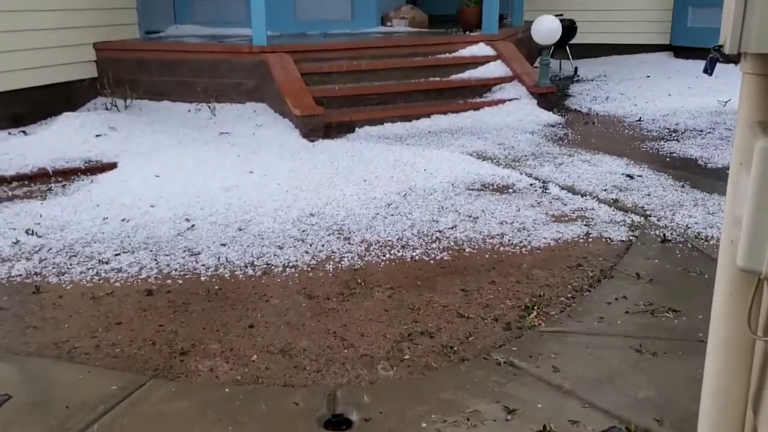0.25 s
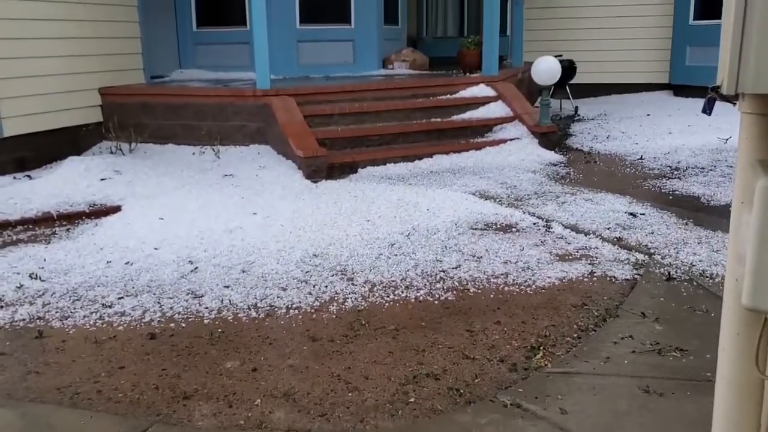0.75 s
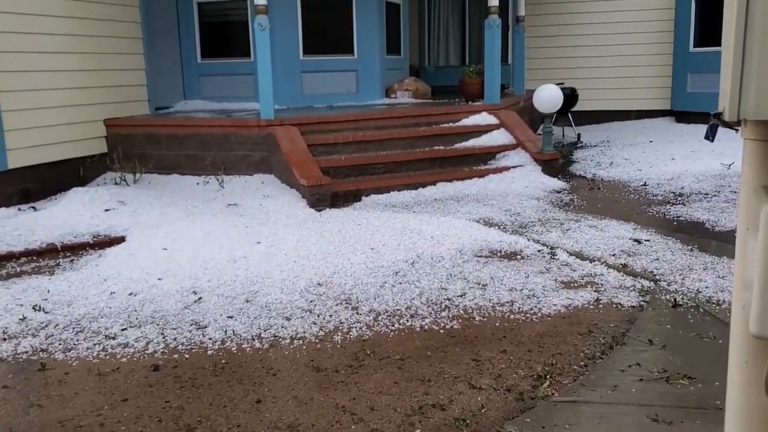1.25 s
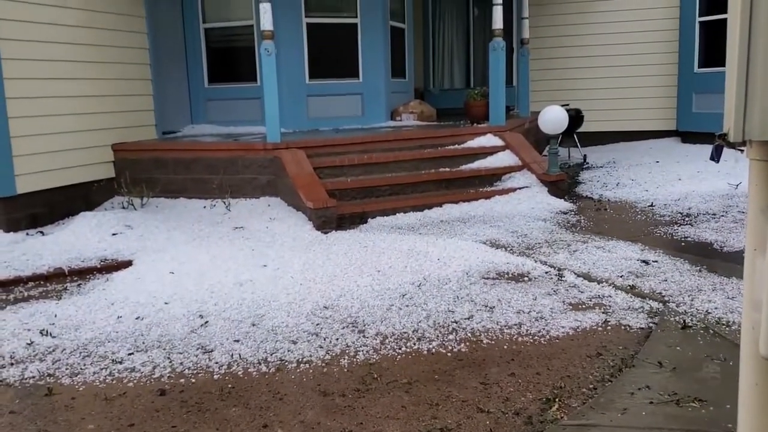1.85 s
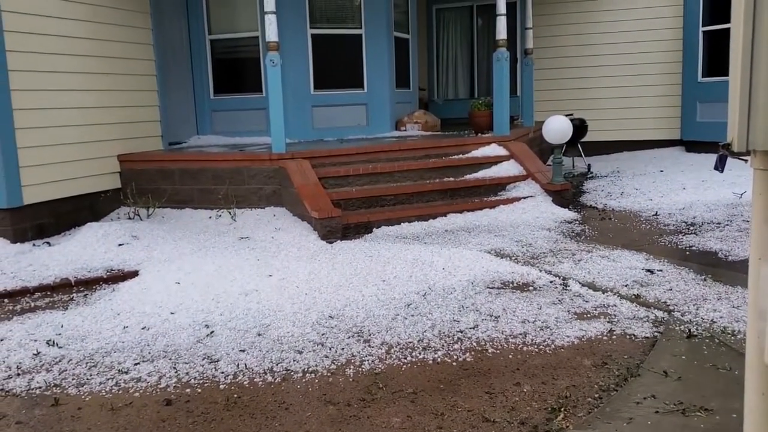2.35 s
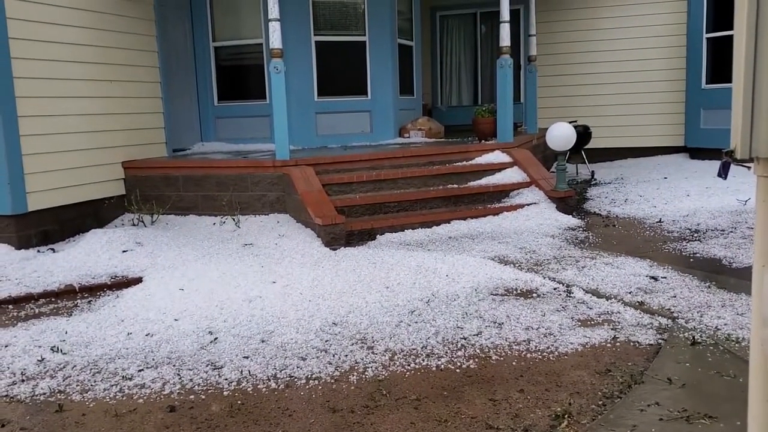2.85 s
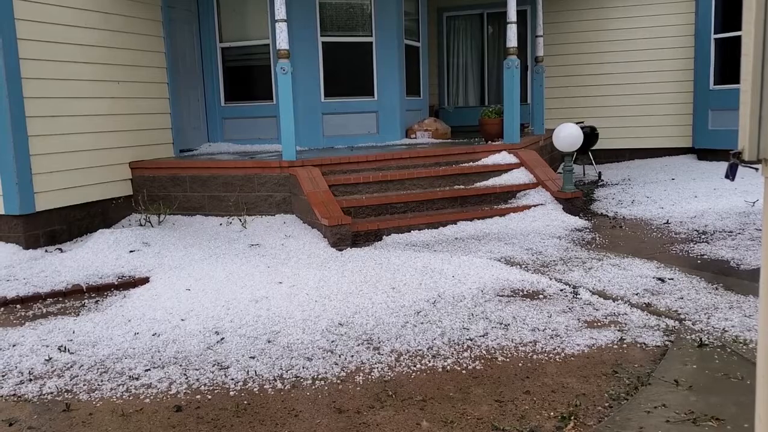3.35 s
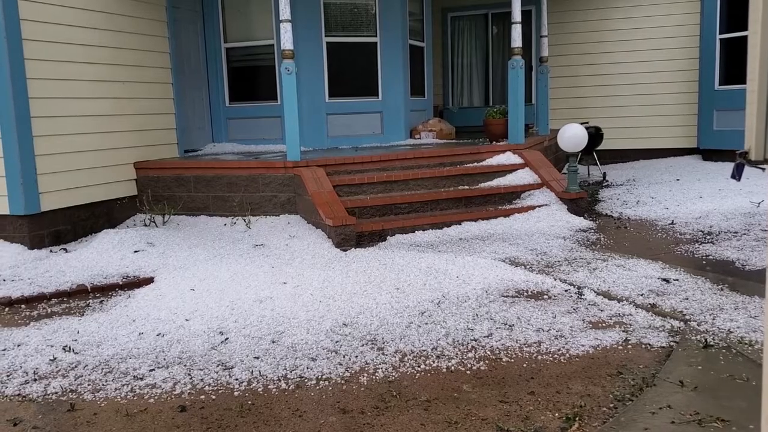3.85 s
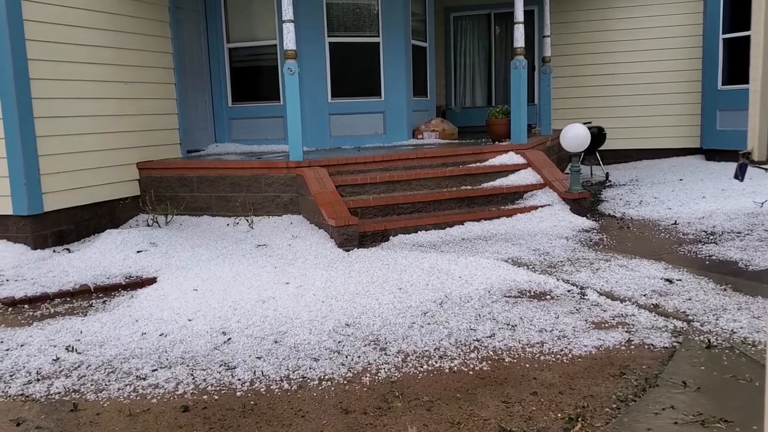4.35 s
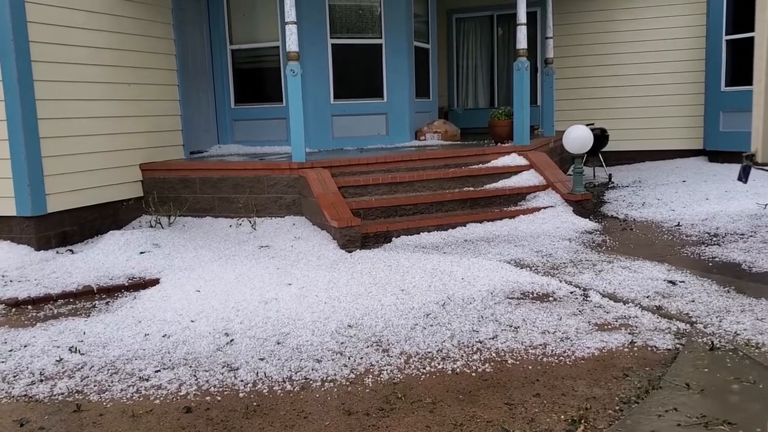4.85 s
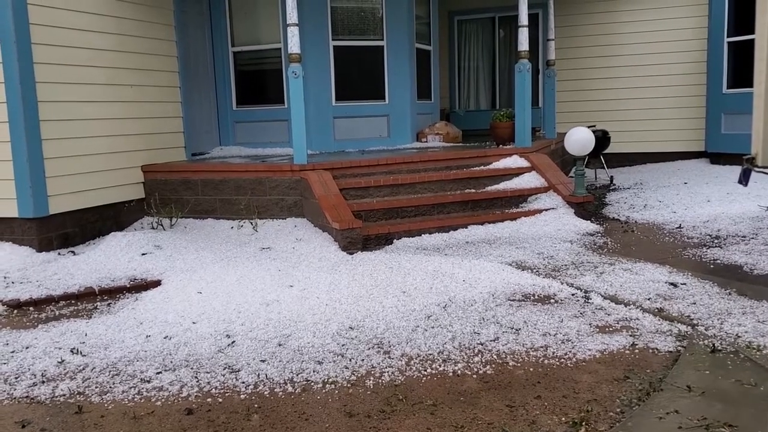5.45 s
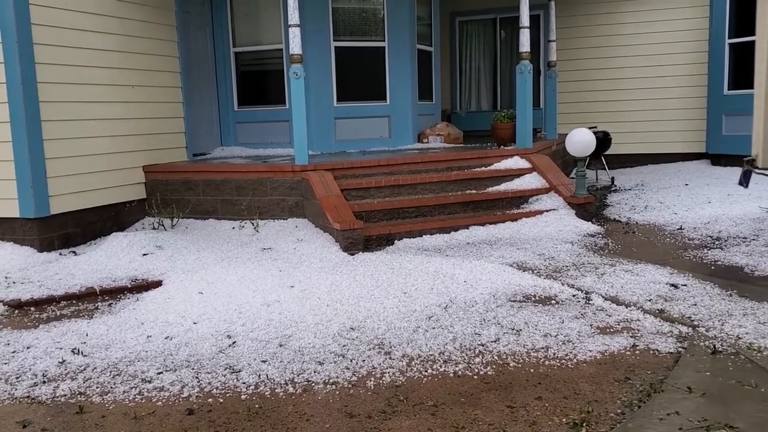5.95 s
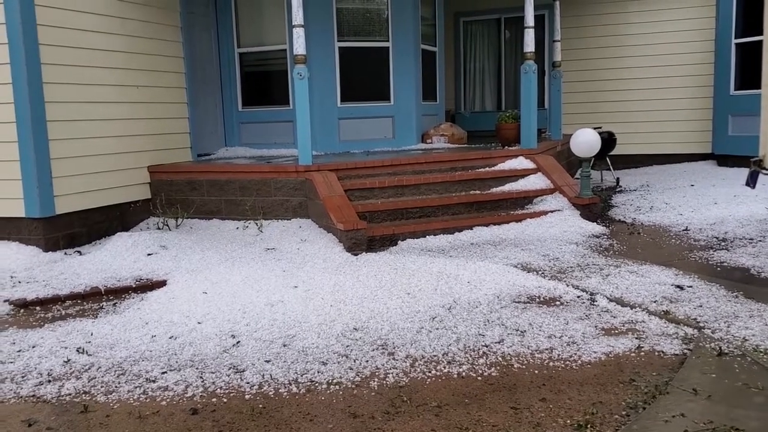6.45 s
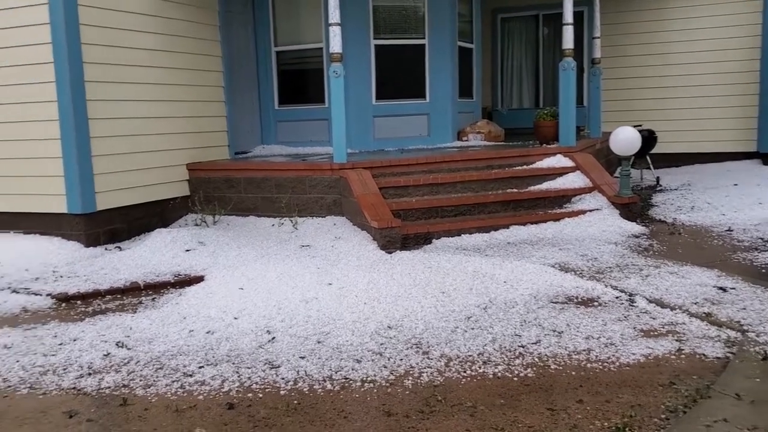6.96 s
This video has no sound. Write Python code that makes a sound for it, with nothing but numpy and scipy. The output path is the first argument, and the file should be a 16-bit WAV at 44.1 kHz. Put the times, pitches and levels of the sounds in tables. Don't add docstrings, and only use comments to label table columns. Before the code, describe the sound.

An outdoor yard in wet weather, no people. Scattered sharp clicks and occasional hard knocks stand out from many fainter drops and a grainy hiss of rain. A few short drips ring in puddles and a downpipe. Wind stays soft, easing briefly midway, while dull far thunder swells in bass throughout and deepens later. The stereo microphone is near the house wall; treble is spread, bass is centred.

```python
import sys
import numpy as np
from scipy import signal
from scipy.fft import rfft, irfft, next_fast_len
from scipy.io import wavfile
from scipy.ndimage import uniform_filter1d, map_coordinates

SR = 44100
rng = np.random.default_rng(int(sys.argv[2]) if len(sys.argv) > 2 else 0)


def volts_from_db(level):
    exponent = np.asarray(level, float) / 20
    return 10 ** exponent


def to_wav(s):
    ch = np.atleast_2d(s).T
    pcm = np.round(np.clip(ch, -1, 1) * 32767)
    wavfile.write(sys.argv[1], SR, pcm.astype(np.int16))


N = 317961
TOP_HZ = 15850


def unit(x):
    return x / np.sqrt(np.mean(x ** 2) + 1e-20)


def along(points, hz):
    f, v = np.transpose(points)
    return np.interp(np.log(hz + 1), np.log(f + 1), v)


def curves(rows):
    s, *cols = np.transpose(rows)
    return [np.interp(np.arange(N) / SR, s, c) for c in cols]


def wobble(rate):
    knots = rng.standard_normal(int(N * rate / SR) + 4)
    return map_coordinates(knots, [np.arange(N) * rate / SR])


def coloured(pair, spectrum):
    # frequency_hz, likeness (-1..1)
    alike = [(60, 0.98), (130, 0.86), (290, 0.91), (640, 0.46), (1410, -0.35), (3100, 0.12), (6820, -0.17),
             (15000, -0.0032)]
    size = next_fast_len(N + 8192)
    hz = np.fft.rfftfreq(size, 1 / SR)
    turn = np.arccos(np.clip(along(alike, hz), -1, 1)) / 2
    gain = volts_from_db(along(spectrum, hz)) * (hz < TOP_HZ)
    mid, side = irfft(rfft(pair, size) * gain * [np.cos(turn), np.sin(turn)], size)[:, :N]
    return unit(np.array([mid + side, mid - side]))


def patchy(patchy_db):
    z = signal.stft(rng.standard_normal((2, N)), nperseg=512)[2]
    field = rng.standard_normal(z.shape[1:])
    for axis in (0, 1):
        field = uniform_filter1d(field, size=8, axis=axis)
    return signal.istft(z * volts_from_db(patchy_db * unit(field)), nperseg=512)[1][:, :N]


def landed(drops, thud_db, scatter_db):
    s, db, ring_hz, splash_db = np.transpose(drops)
    return np.c_[s, db, ring_hz, thud_db + 0 * s, splash_db, scatter_db + 0 * s]


def ticks(rows, ring_db, echo_db, size=4096):
    # frequency_hz, gain_db
    ports = [(900, -20.5), (1700, -8.5), (2300, -3.5), (3100, -3), (4200, -3), (5300, -6), (6600, -1.5),
             (8000, -8.5), (11000, -1), (15700, -5), (16100, -8), (16750, -27), (17000, -82)]
    s, db, ring_hz, thud_db, splash_db, scatter_db = (c[:, None] for c in np.transpose(rows))
    count = len(rows)
    t, hz = np.arange(size) / SR, np.fft.rfftfreq(size, 1 / SR)
    dice = rng.random((count, 4))

    scatter_db = scatter_db - 0.21 * (db + 9.5)
    splash_db = splash_db + 0.13 * (db + 13.0)
    t60_s = 0.065 * volts_from_db(0.5 * (scatter_db + 20.5))
    spray = rng.standard_normal((count, 2, size)) * rng.exponential(1, (count, 1, size))
    onset = 1 - np.exp(-t / 0.00031)
    tail = spray * (volts_from_db(scatter_db - 1.5 - 60 * t / t60_s) * onset)[:, None]
    dull = 1 / (1 + 1j * hz / 9000)

    lag = 0.000362 * (2 * dice[:, :1] - 1) * [1, -1] / 2
    first = (0.0009 + lag)[..., None]
    wall = first + 0.0022 + 0.00025 * (dice[:, 1:3, None] - 0.5)
    shatter = 0.19 * rng.standard_normal((count, 1, size)) * volts_from_db(-60 * t / 0.0044)
    crack = rfft((t == 0) + shatter)
    direct = np.exp(-2j * np.pi * hz * first)
    echo = volts_from_db(echo_db) * np.exp(-2j * np.pi * hz * wall)
    z = rfft(tail) * dull + crack * (direct - echo)

    octave = np.log2((hz + 1) / 5200)
    tilt_db = (thud_db + 14.0) * np.clip(-1.4 * octave, 0, 1.3)
    tilt_db += (splash_db + 16.0) * np.clip(1.97 * octave, 0, 1.7)
    bands = (1.044 + 1.13 * dice[:, 3:]) * np.log2((hz + 1) / ring_hz)
    tilt_db += 0.57 * np.cos(2 * np.pi * bands)
    ring = volts_from_db(ring_db) / (1 + ((hz - ring_hz) / (0.06 * ring_hz)) ** 2)

    cep = irfft(np.log(volts_from_db(along(ports, hz) + tilt_db) * (1 + ring) + 1e-6))
    cep[:, 1:size // 2] *= 2
    cep[:, size // 2 + 1:] = 0
    tick = irfft(z * np.exp(rfft(cep))[:, None])
    tick *= (volts_from_db(db) / np.abs(tick).max(axis=(1, 2))[:, None])[..., None]
    at = np.round(s * SR).astype(int) + np.arange(size)
    return np.array([np.bincount(at.ravel(), tick[:, c].ravel(), N + size)[:N] for c in range(2)])


def near_drops():
    # start_s, peak_db, ring_hz, splash_db
    concrete = [(.4434, -20, 11600, -10), (1.2421, -24, 4010, -19), (1.2678, -19, 4440, -19),
                (1.6109, -26.5, 4300, -23), (2.5335, -23.5, 6000, -20), (2.7147, -10.5, 4700, -16.5),
                (2.7604, -23, 4384, -17), (2.921, -25, 6700, -16), (2.9955, -25.5, 10100, -14),
                (3.4945, -18, 6910, -16.5), (3.5763, -33, 8960, -5), (3.6033, -20.5, 3700, -22.5),
                (3.727, -15, 3460, -21), (3.8512, -20, 6500, -14), (4.6605, -19, 4594, -18.5),
                (5.4161, -20, 4714, -28), (5.6491, -23, 6027, -20), (5.7809, -20.5, 11270, 7),
                (6.0172, -31, 11010, 0), (6.0572, -13, 4020, -23), (6.2524, -13.5, 4200, -16),
                (4.784, -22, 11150, -7), (4.106, -34, 6150, -20), (.62, -32, 11000, -7),
                (.846, -28, 9940, -10), (1.18, -31, 12000, -7)]
    # start_s, peak_db, ring_hz, splash_db
    siding = [
        (1.3227, -21, 3220, -21.5),
        (1.847, -25.5, 2074, -14),
        (2.0358, -29, 2230, -3),
        (2.1679, -23, 2440, -17.5),
        (2.4358, -13, 3980, -20),
        (2.6318, -27, 2560, -14),
        (6.2585, -8.5, 4570, -22),
        (6.9115, -15.5, 2293, -19.5),
    ]
    # start_s, peak_db, ring_hz, splash_db
    slush = [(.0024, -22, 3200, -15), (1.1088, -22.5, 3860, -19), (1.39, -25, 2820, -19),
             (1.4123, -28, 4994, -17), (3.1677, -22.5, 4192, -18.5), (3.9612, -19.5, 2245, -20),
             (4.0527, -26, 3450, -19), (4.1899, -24.5, 3950, -19), (4.3512, -25.5, 6500, -16),
             (4.3647, -22, 3019, -16.5), (5.2556, -25, 5870, -23), (5.5479, -24.5, 4220, -14.5),
             (6.5365, -23.5, 6313, -17), (6.7694, -26, 2490, -12), (6.8851, -18, 4500, -24.5),
             (1.0973, -23, 4250, -17), (2.8, -25, 4200, -17), (4.8444, -29, 1823, -18),
             (5.1466, -27, 2454, -16), (6.5934, -22.5, 2344, -25), (2.2335, -20, 4090, -18.5),
             (.1825, -26.5, 3250, -17.5), (6.986, -23.5, 3386, -17)]
    # start_s, peak_db, ring_hz, splash_db
    gutter = [(.1116, -23.5, 3520, -13), (.2608, -27.5, 3590, -15.5), (.7455, -25, 3580, -9),
              (.9193, -29, 2220, -10), (1.0331, -28, 2380, -15), (1.3764, -26.5, 4400, -9),
              (1.54, -23.5, 2580, -18.5), (1.7392, -34, 2400, -8), (2.0068, -29, 2920, -11),
              (2.4162, -29, 3330, -18), (2.4661, -21, 3370, -16.5), (2.687, -34, 2530, -19),
              (3.1185, -28.5, 2483, -12), (3.4391, -32.5, 2280, -5), (4.7119, -31, 11400, -3),
              (5.2897, -27, 4190, -10), (5.8797, -25.5, 11010, -7), (6.4858, -26.5, 4310, -11),
              (6.6483, -27, 2495, -28), (6.6999, -41, 6218, -16), (7.0996, -29, 2201, -22)]
    drops = np.r_[landed(concrete, thud_db=-22.5, scatter_db=-22),
                  landed(siding, thud_db=-15, scatter_db=-19),
                  landed(slush, thud_db=-16.5, scatter_db=-15.5),
                  landed(gutter, thud_db=-8.5, scatter_db=-17.5)]
    return volts_from_db(3.0) * ticks(drops, ring_db=1, echo_db=0)


def small_drops(count):
    u = rng.random((count, 6))
    size_db = -39 - 0.92 * np.log(1 - u[:, 1]).clip(-2)
    ring_hz = 2100 * 2 ** (2.22 * u[:, 2] ** 2)
    thud_db, splash_db, scatter_db = -24 + 14 * u[:, 3], -22 + 12 * u[:, 4], -20 + 9 * u[:, 5]
    return np.c_[u[:, 0] * N / SR, size_db, ring_hz, thud_db, splash_db, scatter_db]


def far_patter(patter_db):
    # frequency_hz, density_db (dB per Hz)
    patter = [(590, -15), (1000, -1.5), (1290, -0.5), (2210, 1), (2630, -3), (4080, -2.5), (6470, -4.5),
              (7300, -10), (8050, -12), (8800, -9.5), (11400, -5.5), (15200, -8), (15800, -8)]
    grains = (rng.random((2, N)) < 2500 / SR) * volts_from_db(4.8 * rng.standard_normal((2, N)))
    grains = grains * np.sign(rng.standard_normal((2, N)))
    far = coloured(patchy(patchy_db=2.07) + 0.4 * unit(grains), patter)
    return volts_from_db(patter_db + 2.5 + 0.85 * wobble(9)) * far


def rain():
    # start_s, patter_db
    shower = [(0.0, -44.5), (0.34, -43.5), (0.66, -45.5), (1.0, -44), (1.59, -44.5), (1.77, -44),
              (1.97, -45), (2.57, -44.5), (4.68, -43.5), (4.74, -41.5), (5.05, -40.5), (5.8, -41),
              (6.43, -41.5), (6.85, -40), (7.21, -40.5)]
    patter_db, = curves(shower)
    pan_db = 1.0 + 0.71 * (patter_db + 43.5)
    near = near_drops() + plops()
    small = volts_from_db(patter_db + 49.0) * ticks(small_drops(count=330), ring_db=4.5, echo_db=-1.5, size=3072)
    return (near + small + far_patter(patter_db)) * volts_from_db(pan_db * np.array([[0.5], [-0.5]]))


def wind():
    # frequency_hz, density_db (dB per Hz)
    wind_colour = [(120, -10.5), (200, -1), (284, -7), (345, -5.5), (549, -14), (736, -11.5), (932, -18.5),
                   (1400, -32.5), (1820, -37), (3080, -120)]
    # start_s, level_db
    gusts = [
        (0.0, -43),
        (0.06, -45),
        (1.42, -44),
        (1.51, -42.5),
        (3.84, -45),
        (3.99, -47),
        (4.7, -43),
        (7.21, -43),
    ]
    gust_db = curves(gusts)[0] + 0.4 * wobble(2.73)
    return volts_from_db(gust_db + 2.5) * coloured(patchy(patchy_db=1.5), wind_colour) * volts_from_db([[0.6], [-0.6]])


def peals():
    # start_s, boom_db, pitch_hz, hold_s
    peal_rows = [(.18, -36, 62.2, 0.034), (0.31, -34, 62.5, 0.15), (.53, -44, 64.3, .22),
                 (0.92, -40, 62.9, 0.063), (1.197, -42, 65.7, 0.12), (1.362, -32, 70.3, 0.07),
                 (1.535, -29, 72.2, 0.045), (1.799, -29, 62.3, 0.073), (1.967, -40, 61.8, 0.25),
                 (2.47, -27, 64.8, 0.07), (2.581, -27, 68.2, 0.038), (2.74, -32, 68.5, 0.06),
                 (2.866, -32.5, 70.5, 0.078), (3.057, -30, 68.1, 0.078), (3.185, -40, 62.7, 0.056),
                 (3.446, -34, 64.4, 0.04), (3.56, -30.5, 65.9, 0.14), (3.75, -22.5, 64.8, 0.074),
                 (3.91, -27, 63.8, 0.046), (4.16, -35, 63, .09), (4.359, -25, 63.3, 0.1),
                 (4.572, -30.5, 59, 0.28), (4.876, -30.5, 57, .08), (5.05, -27, 55.9, 0.092),
                 (5.24, -27, 55.7, .14), (5.44, -24, 53.9, 0.52), (5.995, -22, 57.04, 0.23),
                 (6.36, -31, 55.84, .3), (6.786, -23.5, 64, 0.17), (7.002, -21.5, 62, 0.086)]
    swell_s, fade_s = 0.0095, 0.023
    s, db, hz, hold = (c[:, None] for c in np.transpose(peal_rows))
    t = np.arange(0, N / SR, 1 / 500)
    rise = (np.clip(s - t, 0, None) / swell_s) ** 2
    fall = (np.clip(t - s - hold, 0, None) / fade_s) ** 2
    gain = (volts_from_db(db) * np.exp(-rise - fall)).max(axis=0)
    now = np.arange(N) / SR
    return np.interp(now, (s + hold / 2)[:, 0], hz[:, 0]), np.interp(now, t, gain)


def thunder():
    # frequency_hz, density_db (dB per Hz)
    rumble = [(13, -50), (25, -6), (42, 1), (61, 8), (95, -2), (130, -8.5), (165, -8.5), (240, -21.5),
              (310, -20), (530, -120)]
    # start_s, rumble_db
    roll = [(0.0, -38.5), (0.08, -46), (0.16, -35.5), (0.46, -38.5), (2.07, -38.5), (2.21, -34.5),
            (2.31, -43.5), (2.81, -35.5), (2.87, -38.5), (3.25, -32.5), (3.27, -35.5), (4.4, -40),
            (6.07, -37), (7.21, -37.5)]
    pitch_hz, swell = peals()
    rumble_db, = curves(roll)
    swell = swell + volts_from_db(rumble_db - 2)
    phase = 2 * np.pi * np.cumsum(pitch_hz + 3 * wobble(14)) / SR
    stray = np.array([wobble(11), wobble(11)])
    boom = unit(volts_from_db(1.7 * wobble(18)) * np.sin(phase + 0.36 * stray))
    broad = coloured(patchy(patchy_db=1.0), [(hz, db - 8 * (hz < 76)) for hz, db in rumble])
    lift = (swell / volts_from_db(rumble_db)) ** 0.19
    return (volts_from_db(-6.0) * swell * boom + volts_from_db(rumble_db + 3.5) * lift * broad) * volts_from_db([[-0.7], [0.7]])


def plops():
    # start_s, peak_db, pitch_hz, t60_s
    drips = [(1.54, -23.5, 1230, 0.027), (1.541, -30, 1920, 0.022), (1.539, -33, 2500, 0.032),
             (1.556, -30, 274, 0.074), (1.738, -27.5, 2300, 0.028), (1.826, -25, 1105, 0.024),
             (1.851, -24.5, 1100, 0.033), (3.961, -25.5, 2010, 0.079), (3.961, -24.5, 2234, 0.037),
             (3.961, -28, 4220, 0.041), (4.845, -29, 1863, 0.025), (5.178, -30, 2249, 0.023),
             (5.553, -24.5, 904, 0.029), (5.763, -30, 800.7, 0.027), (2.437, -29, 2240, 0.016),
             (2.437, -21, 5590, .02), (6.085, -25, 162, 0.15), (6.594, -33, 2150, 0.027),
             (6.593, -28, 2470, 0.036), (6.649, -27, 2544, .025), (6.65, -30, 2150, .025),
             (1.739, -32, 2600, 0.02)]
    out, t = np.zeros((2, N + SR)), np.arange(SR // 8) / SR
    arrival = t - [[0], [0.00042]]
    for s, db, hz, t60 in drips:
        drift = 0.055 * np.cumsum(rng.standard_normal(len(t)))
        decay = volts_from_db(db - 60 * t / t60) * (1 - np.exp(-t / 0.0004))
        ring = decay * np.sin(2 * np.pi * hz * arrival + drift)
        out[:, round(s * SR):][:, :len(t)] += ring * volts_from_db([[2.5], [-3.5]])
        out[:, round((s + 0.0072) * SR):][:, :len(t)] += volts_from_db(-4) * ring[::-1]
    return volts_from_db(3.0) * out[:, :N] / volts_from_db(3.0)


def scene():
    return rain() + wind() + thunder()


def low_pass(x):
    return signal.sosfilt(signal.butter(12, 16780, fs=SR, output="sos"), x)


def record(dry):
    hz = np.fft.rfftfreq(N + N % 2, 1 / SR)
    top = irfft(rfft(dry, N + N % 2) * (hz > TOP_HZ))[:, :N]
    power = uniform_filter1d((top ** 2).mean(axis=0), size=256)
    bright = np.abs(power) > volts_from_db(-52) ** 2
    gate = uniform_filter1d(1. * bright, size=128)
    return low_pass(dry - (1 - gate) * top)


dry = scene()
out = record(dry)
to_wav(out)
```